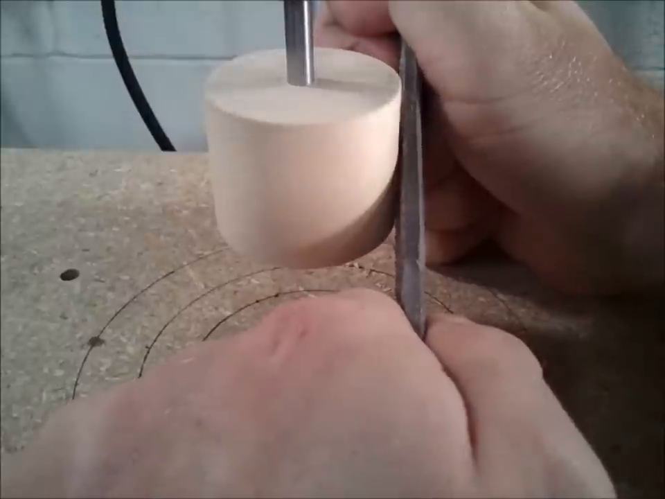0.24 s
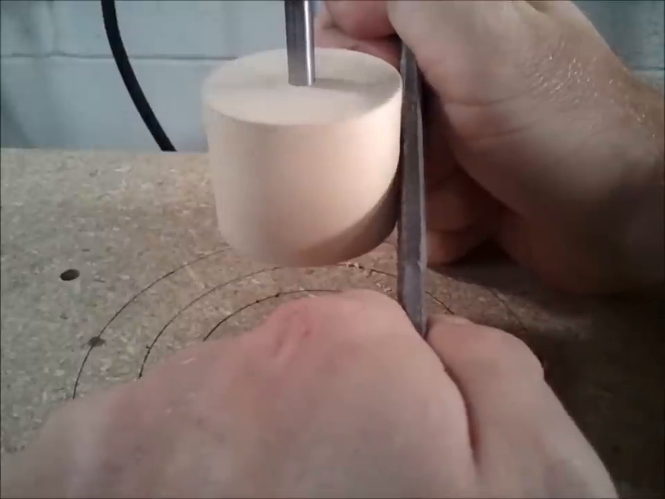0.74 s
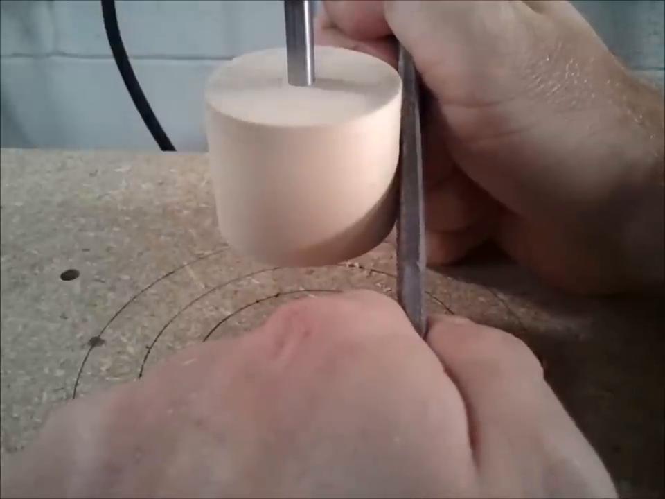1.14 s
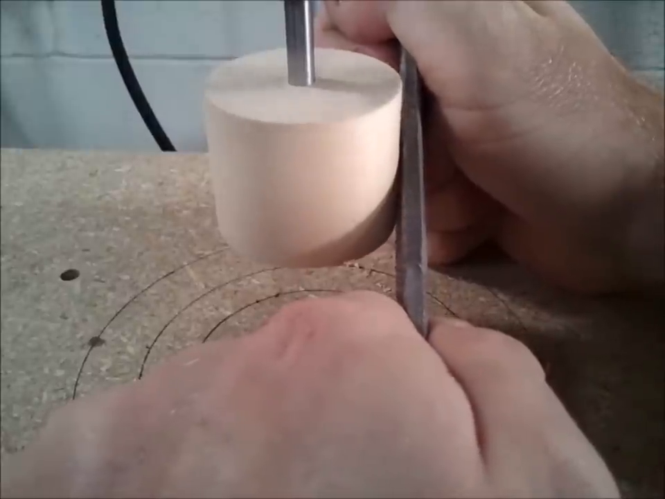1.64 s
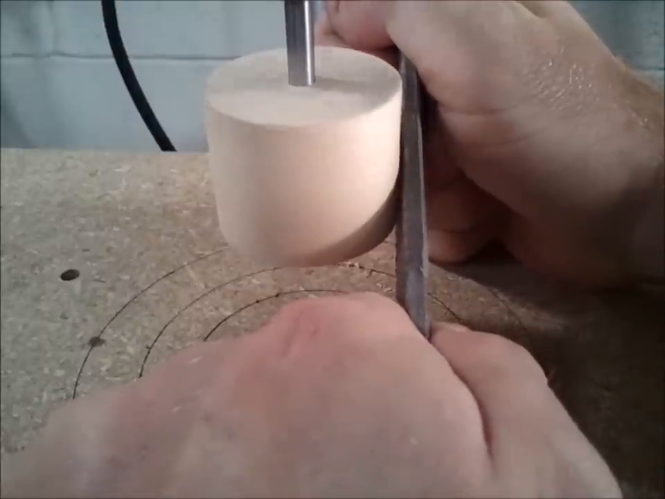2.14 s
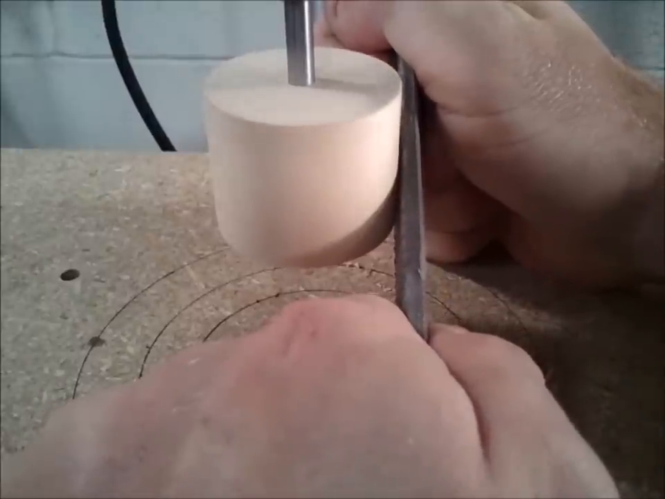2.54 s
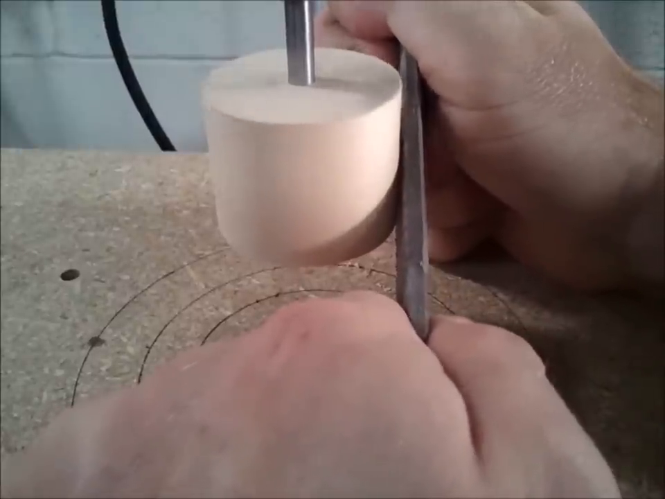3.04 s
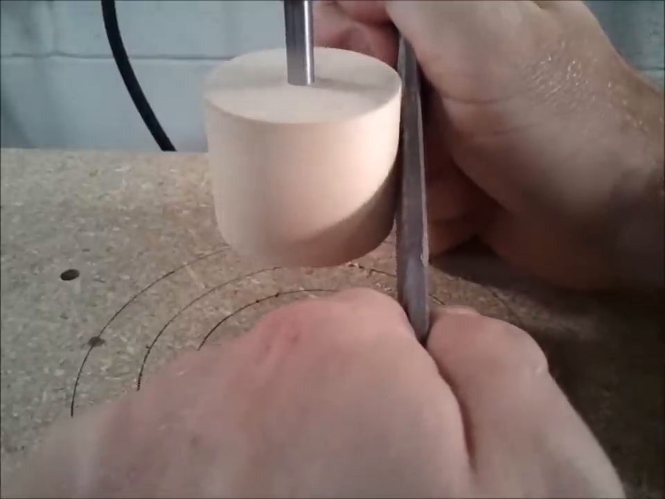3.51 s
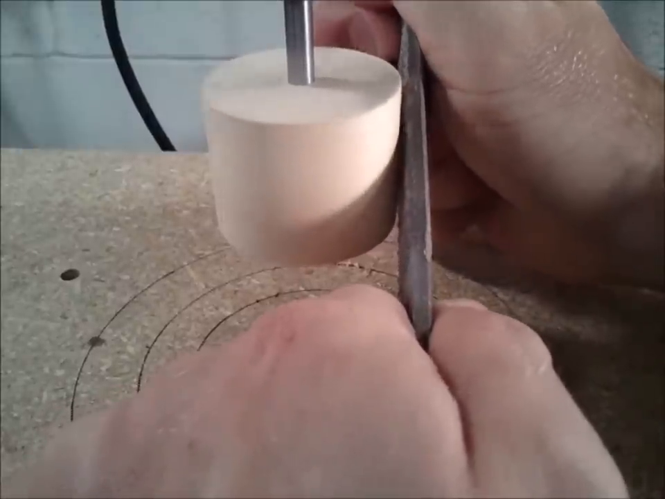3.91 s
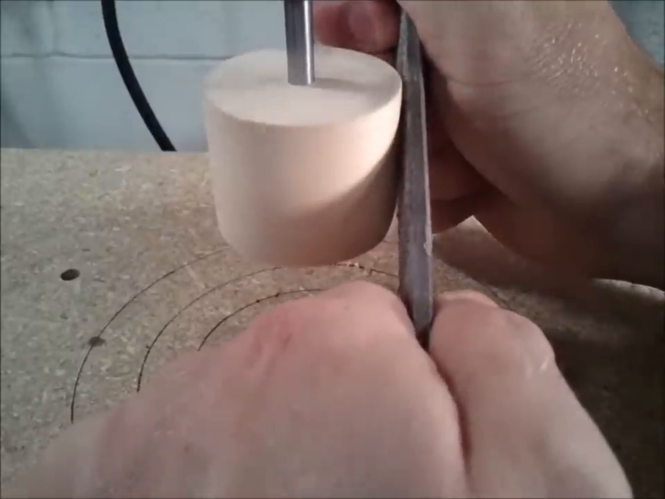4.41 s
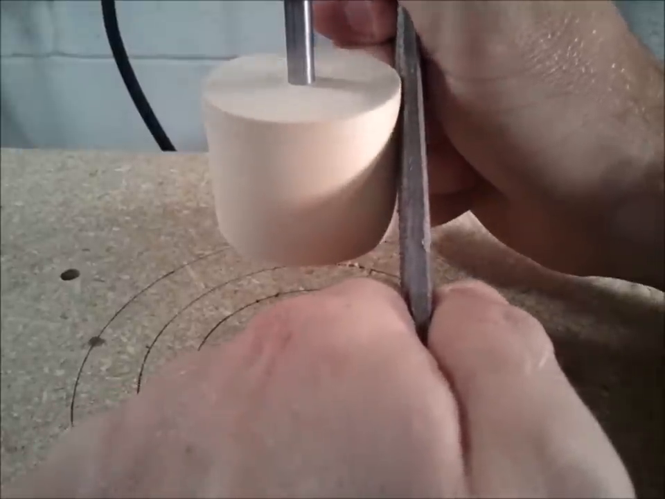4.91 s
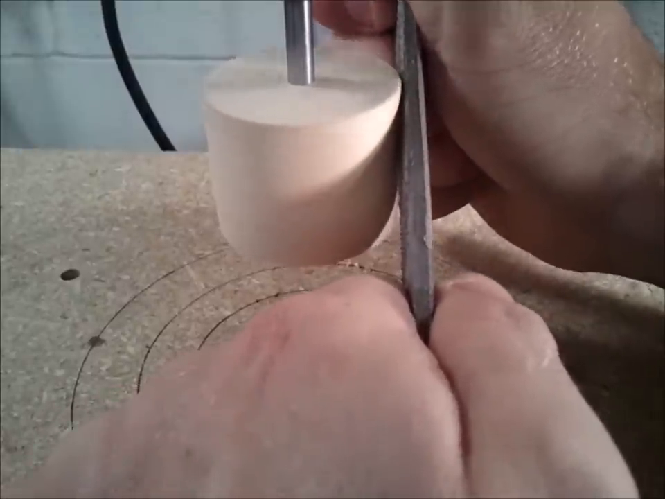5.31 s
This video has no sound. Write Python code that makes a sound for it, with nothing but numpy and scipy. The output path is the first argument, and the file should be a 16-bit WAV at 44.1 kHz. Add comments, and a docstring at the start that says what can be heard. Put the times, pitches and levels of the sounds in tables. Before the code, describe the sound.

Close up in a small workshop, a steel rasp grazes a wooden drum turning about nine times a second. Hissing scrapes pulse with each turn, with little zings and clacks. From about two seconds it bites harder: hollow judders, knocks and cracking splinters fill in the gaps. Late on the judder settles toward one pitch. A low motor hum runs underneath; treble is rather dull at the very top.

```python
"""In a small workshop, a wood rasp is held against an out-of-round wooden drum that spins in a drill press.
At first the teeth only graze: they bounce, land with a zing and sound in pulses once a turn.
Then the hands press harder and the teeth bite all the way round, with judders, knocks and cracking splinters.
Later the hands tip the blade over and its judder settles closer to one pitch.
Throughout, noisy tooth strikes ring the table, wood and steel blade, over the motor's hum tones and rumble."""
import sys
import numpy as np
from scipy import signal
from scipy.fft import rfft, irfft
from scipy.io import wavfile
from scipy.ndimage import uniform_filter1d

SR = 44100
rng = np.random.default_rng(int(sys.argv[2]) if len(sys.argv) > 2 else 0)


def generate_wav(sig):
    """Save sig (samples, or channels by samples) to the path in sys.argv[1] as 16-bit PCM at SR."""
    pcm = np.round(np.clip(np.atleast_2d(sig).T, -1, 1) * 32767).astype(np.int16)
    wavfile.write(sys.argv[1], SR, pcm)


N = 244975   # length in samples
TURNS_PER_S = 9.16   # speed of the drum


# The work of the hands. Each row: time in seconds, push on the table in dB,
# tearing of fibres in dB, hiss of the teeth in dB.
HAND_WORK = [(0, -31, -43.5, -39), (.52, -35, -44, -39), (.66, -41, -48, -40.5), (1.05, -37, -46.5, -39),
             (1.52, -42.5, -48, -39), (1.78, -35.5, -43.5, -37), (2.3, -33, -42, -35.5),
             (2.8, -31, -41.5, -35.5), (3.3, -32, -38, -35.5), (3.8, -29.5, -37.5, -35),
             (4.35, -31.5, -39, -36.5), (4.9, -30.5, -38, -36), (5.55, -33, -38, -37)]


def rasp():
    """Teeth catch and slip, shaking the table, tearing fibres, throwing chips and hissing."""
    push_db, tear_db, hiss_db = in_time(HAND_WORK)
    bite, rub, lift = contact()
    snag = drift(88)   # single rows of teeth dig in for a few milliseconds
    fibre_db = tear_db + 1.12 * bite
    teeth_db = hiss_db + 0.86 * rub
    chip_db = 0.5 * fibre_db + 0.44 * teeth_db - 9.5

    thrum = table(push_db, bite, shake_db=1.4 * lift + 1.6 * snag)
    thrum = thrum + drone(lift, push_db + bite, hz=418.9, level_db=-40.5)

    tear_hits = surface(hits_per_s=2800, spread_db=3.0, memory=0.35)
    tear = drum_wall(tear_hits * from_db(fibre_db + 0.89 * snag - 1.7))
    chip_hits = surface(hits_per_s=5000, spread_db=2.0, memory=0.26)
    chips = chip_sound(chip_hits * from_db(chip_db + 1.46 * snag + 0.46 * drift(120)))
    wood = sliding_echo(tear + chips, delay_s=.0031, share=0.43, swing=.1, wander=.12)

    steel = sliding_echo(blade_hiss(teeth_db), delay_s=.00142, share=0.49, swing=0.054, wander=0.024)
    note_level = from_db(hiss_db + 1.6 * rub - 13.5)
    note = note_level * contact_note(bite, top_hz=6540, bend_hz=950, width_hz=82)

    ticks = snaps(fibre_db, wood_db=-9.5, chip_db=-16.5)
    patches = grain_patches(hiss_db + lift, tear_db + 0.5 * lift)
    return knocks(thrum + judder()) + wood + ticks + splinters() + steel + note + landing_zings() + patches


# The high places of the oval drum. Each row: angle in turns, half arc in turns,
# bite in dB when grazing, bite in dB when seated (both added to the low side's bite).
HIGH_SIDES = [(.77, 0.042, 4, 3.5), (.83, 0.11, 7.5, 5.5), (.94, 0.062, 7, 4.5), (1.038, 0.052, 1, 5.5),
              (.44, .12, 1.5, 7.5), (.44, .03, 0.5, 2.5), (.58, .035, 3.5, 2)]
LOW_SIDE_BITE_DB = -5.5
# Ridges of hard grain that rub on the teeth. Each row: angle in turns, half arc in turns,
# rub in dB with the blade upright, rub in dB tilted (both added to the soft grain's rub).
RIDGES = [(0.52, 0.099, 5.5, 5), (0.738, 0.11, 4, 2.5), (1, 0.098, 5, -1.5), (.23, 0.056, -2.5, 3)]
SOFT_GRAIN_RUB_DB = -1.5


def contact():
    """Bite, rub and lift (dB) as the uneven drum passes under the rasp."""
    lean, lift = tilt(), bounces()
    seated = np.clip(seating() + .5, 0, 1)
    bite = LOW_SIDE_BITE_DB + .26 * lift
    for angle, arc, grazing_db, seated_db in HIGH_SIDES:
        bite = bite + bump(turns_from(angle), arc) * (grazing_db + seated * (seated_db - grazing_db))
    rub = SOFT_GRAIN_RUB_DB + lift
    for angle, arc, upright_db, tilted_db in RIDGES:
        rub = rub + bump(turns_from(angle), arc) * (upright_db + lean * (tilted_db - upright_db))
    return bite, rub, lift


# How the rasp sits on the drum. Each row: time in seconds,
# seating as a plain number (below 0 grazing, 0 just touching all round, 1 cutting all round).
SEATING = [(0, -0.3), (1.57, -0.44), (1.75, -0.26), (2.4, .25), (2.9, 1)]


def seating():
    """The seating rises as the teeth come to touch more of the drum's round."""
    return in_time(SEATING)[0]


TILT_FROM_S, TILT_TO_S = 3.44, 4   # the hands tip the blade over to a new angle


def tilt():
    """Lean of the blade, 0 upright to 1 tipped over."""
    return np.clip((seconds() - TILT_FROM_S) / (TILT_TO_S - TILT_FROM_S), 0, 1)


# While lightly held, the rasp bounces off the drum's flat. Each row: time in seconds when it lands again,
# time in the air in seconds, loss of contact in dB at the most.
BOUNCES = [(0.049, 0.014, -6.5), (0.157, 0.023, -8), (.265, 0.031, -11), (.375, .03, -6.5),
           (0.485, 0.027, -5.5), (.603, 0.043, -13), (.727, 0.071, -13.5), (.833, 0.063, -16),
           (0.925, 0.039, -8.5), (1.031, 0.02, -6.5), (1.143, 0.03, -14), (1.25, 0.029, -7),
           (1.362, 0.0337, -12.5), (1.478, 0.044, -14), (1.586, 0.049, -13.5), (1.682, 0.031, -6),
           (1.79, 0.032, -4), (1.9, 0.021, -5.5), (2.013, 0.024, -10)]
LEAVING_SHARE, TOUCHDOWN_S = 0.46, 0.0064   # it eases off over this share of the flight, lands abruptly


def bounces():
    """Loss of contact (dB) while the rasp is in the air."""
    t = seconds()
    lift = 0
    for lands, air_s, db in BOUNCES:
        leaving = np.clip((t - lands + air_s) / (LEAVING_SHARE * air_s), 0, 1)
        still_up = np.clip((lands - t) / TOUCHDOWN_S + .5, 0, 1)
        lift = lift + db * leaving * still_up
    return lift


# Ringing modes of press table and spindle. Each row: pitch in Hz, width in Hz, level in dB,
# dB gained per dB of push, dB gained per dB of bite.
TABLE_MODES = [(276, 45, -20, 1.5, 0.8), (366.2, 17, -12, 0.66, 0.5), (415.9, 14, -7.5, 1.5, 0.4),
               (476.7, 17, -8, 1.5, 0.5), (549.3, 12, -14.5, 2, 0), (612.5, 20, -10.5, 1.5, 0.7),
               (657.7, 24, -13, -0.1, 0), (737.3, 14, -12.5, 0.5, 1.87)]
TABLE_WANDER_S = 0.00038   # the shifting hands bend the ring a little in phase and pitch (spread of the delay)
USUAL_PUSH_DB = -32


def table(push_db, bite, shake_db):
    """The cutting force rings the table; some modes wake only under a hard push or a deep bite."""
    hits = surface(hits_per_s=2500, spread_db=2.0, memory=0.68)
    force = hits * from_db(USUAL_PUSH_DB + shake_db)
    extra_db = push_db - USUAL_PUSH_DB
    rings = 0
    for k, (hz, width_hz, db, push_growth, bite_growth) in enumerate(TABLE_MODES):
        mode_force = force * from_db(db + push_growth * extra_db + bite_growth * bite)
        rings = rings + (-1) ** k * driven(mode_force, hz, width_hz)   # neighbours in opposite phase
    rings = np.interp(seconds() - TABLE_WANDER_S * drift(6.36), seconds(), rings)
    return signal.sosfilt(signal.butter(2, [210, 950], "band", fs=SR, output="sos"), rings)


def driven(force, hz, width_hz):
    """A mode under friction: over a turn it swings as hard as it is driven."""
    ring = resonate(force, hz, width_hz)
    return ring * turn_rms(force) / turn_rms(ring)


# The drone swells and bends with each turn. Each row: angle in turns, swell in dB when grazing,
# swell in dB when seated, swell in dB when tilted, bend in Hz.
DRONE_SWELL = [(.06, 1.5, 9, 3, 12), (.2, 6, 0.5, -2, 5), (.36, -0.5, 2.5, -1, -12),
               (.55, -5.5, 0.5, 1, -10), (.72, -3, 1, 2, -8), (.9, 2, 1, 5, 14)]
# a harder push or a deeper bite stiffens the contact and sharpens the drone
DRONE_RISE_HZ_PER_DB, DRONE_RISE_FROM_DB = 2, -37


def drone(lift, force_db, hz, level_db):
    """Friction keeps the strongest table mode sounding as a tone that swells and bends every turn."""
    angles, *columns = np.transpose(DRONE_SWELL)
    turns = seconds() * TURNS_PER_S
    grazing_db, seated_db, tilted_db, bend_hz = [np.interp(turns, angles, c, period=1) for c in columns]
    rise_hz = DRONE_RISE_HZ_PER_DB * np.maximum(force_db - DRONE_RISE_FROM_DB, 0)
    phase = 2 * np.pi * np.cumsum(hz + rise_hz + bend_hz + 8 * drift(22)) / SR
    swell_db = grazing_db + np.clip(seating(), 0, 1) * (seated_db - grazing_db)
    swell_db = swell_db + tilt() * (tilted_db - seated_db)
    late_lift = np.roll(lift, SR // 100)   # the ring lags the contact by 10 ms
    return np.sqrt(2) * from_db(level_db + swell_db + 0.3 * late_lift + 1.8 * drift(32)) * np.sin(phase)


# The blade judders over the high spot of the drum. Each row: time in seconds, level in dB.
JUDDER = [(0, -39), (.5, -41.5), (.7, -42), (1.4, -41), (1.8, -33), (2.8, -35.5), (3.4, -35.5),
          (3.9, -28.5), (4.35, -31.5), (4.75, -32), (5.55, -36.5)]
# Its pitch falls as the spot slides off. Each row: angle from the high spot in turns,
# pitch in Hz while the blade is upright.
JUDDER_PITCH = [(-.22, 726), (-.15, 660), (-.09, 580), (-.04, 486), (.01, 435), (.12, 406.6)]
TILTED_JUDDER_HZ, TILTED_JUDDER_SHARE = 458.4, 0.92   # a tipped blade judders closer to one pitch
# The opposite side of the oval judders too. Each row: time in seconds, level in dB.
BACK_JUDDER = [(0, -49), (1.5, -52), (1.8, -34), (2.5, -32.5), (3.4, -28.5), (3.9, -36), (4.6, -32.5),
               (5.55, -38)]
BACK_ANGLE, BACK_HALF_ARC = .44, 0.072   # in turns
BACK_HZ, BACK_SAG_HZ_PER_TURN = 646, 351   # pitch at that angle, and how fast it falls


def judder():
    """Twice a turn the blade sticks and slips on a high spot: short, rough, falling notes."""
    (level_db,), (back_db,) = in_time(JUDDER), in_time(BACK_JUDDER)
    away, past = turns_from(0), turns_from(BACK_ANGLE)
    hz = np.interp(away, *np.transpose(JUDDER_PITCH))
    hz = hz + TILTED_JUDDER_SHARE * tilt() * (TILTED_JUDDER_HZ - hz)
    front = bump(away + 0.067, half=0.11) * rough_note(hz, level_db)
    back_hz = BACK_HZ - BACK_SAG_HZ_PER_TURN * past
    return front + bump(past, BACK_HALF_ARC) * rough_note(back_hz, back_db)


def rough_note(hz, level_db):
    """Stick and slip make a tone uneven in pitch and strength."""
    phase = 2 * np.pi * np.cumsum(hz * (1 + .031 * drift(40))) / SR
    return np.sqrt(2) * from_db(level_db + 1.2 * drift(90)) * np.sin(phase)


# The teeth dig in and the work knocks. Each row: time in seconds, half length in seconds,
# pitch in Hz, level in dB.
HARD_DIGS = [(.212, 0.0058, 570, -28.5), (.427, 0.011, 740, -33), (.543, 0.0052, 580, -32.5),
             (1.63, 0.0053, 562, -27), (1.749, 0.0096, 479.6, -27.5), (1.85, .01, 509, -30.5),
             (2.175, 0.0065, 526, -31), (2.283, 0.0069, 509, -26.5), (2.393, 0.0068, 523, -26.5),
             (2.667, 0.0053, 675.7, -27.5), (2.777, .0035, 635.2, -25.5), (2.839, .006, 457.1, -24),
             (2.892, 0.0064, 500, -28.5), (2.994, 0.0057, 683.6, -28), (3.218, 0.0046, 548, -28),
             (3.437, .005, 550.3, -27.5), (3.481, .005, 536, -30.5), (3.556, 0.0053, 607, -27),
             (3.605, .005, 465, -28), (3.7, .005, 476.5, -25.5), (3.794, .0028, 485, -23.5),
             (3.8215, 0.0013, 501, -21.5), (3.914, 0.01, 499.4, -24), (3.993, 0.0063, 492, -25.5),
             (4.028, .007, 499, -26), (4.087, 0.0053, 490, -22), (4.694, 0.0057, 450.6, -21),
             (4.792, 0.0064, 458, -24.5), (4.908, 0.0074, 467, -29), (5.02, .007, 465, -28),
             (5.231, .0044, 463, -22), (5.349, 0.0037, 455, -26)]
DIG_CHOKE = 0.51   # share of the thrum that a dig holds still


def knocks(thrum):
    """A dig chokes the ring of table and judder and shakes the work at its own pitch for a few cycles."""
    t, out = seconds(), thrum.copy()
    for s, half, hz, db in HARD_DIGS:
        near = abs(t - s) < 4 * half
        shake = np.sqrt(2) * from_db(db) * np.sin(2 * np.pi * hz * (t[near] - s))
        out[near] += bump(t[near] - s, half) * (shake - DIG_CHOKE * thrum[near])
    return out


# Sound of the drum wall as the fibres tear. Each row: frequency in Hz, relative level in dB per Hz.
TEAR = [(250, -13.5), (500, -2.5), (640, 3), (690, -3), (738, 3.5), (790, -3), (850, 0.5), (920, -6),
        (1080, 0.5), (1270, -5.5), (1420, -2.5), (1550, -3.5), (1660, -5), (1800, -18), (1950, -25.5),
        (2600, -35.5)]


def drum_wall(x):
    """The wooden drum wall colours whatever tears or cracks in it."""
    return colour(x, TEAR)


# Sound of splintering chips. Each row: frequency in Hz, relative level in dB per Hz.
CHIPS = [(900, -5), (1650, -0.5), (1850, 0), (2150, 1), (2900, 0), (3200, 0), (3750, -1.5), (4500, -0.5),
         (6000, -26.5), (8000, -26)]


def chip_sound(x):
    """Small chips sound higher and brighter than the wall."""
    return colour(x, CHIPS)


def snaps(fibre_db, wood_db, chip_db):
    """Single fibres snap: dry ticks that sound through drum wall and chips at once."""
    ticks = surface(hits_per_s=260, spread_db=3.5, memory=0.19) * from_db(fibre_db)
    return from_db(wood_db) * drum_wall(ticks) + from_db(chip_db) * chip_sound(ticks)


# Whole splinters crack off. Each row: time in seconds, level in dB.
SPLINTERS = [(.065, -38), (.204, -32), (.415, -33), (0.544, -34), (.852, -39), (1.402, -33.5), (1.727, -33),
             (2.27, -35), (2.667, -32), (3.102, -34), (3.25, -29), (3.321, -33), (3.541, -36),
             (3.653, -27.5), (3.762, -29), (4.46, -28.5), (4.999, -33.5)]
SPLINTER_HALF_S, SPLINTER_CHIP_DB = .0024, -9   # half length, and level of the chip sound


def splinters():
    """A splinter breaks in a tight cluster of snaps."""
    breaking = sum(from_db(db) * bump(seconds() - s, SPLINTER_HALF_S) for s, db in SPLINTERS)
    cracks = breaking * surface(hits_per_s=3000, spread_db=3.0, memory=.1)
    wall = signal.sosfilt(signal.butter(2, 850, "high", fs=SR, output="sos"), drum_wall(cracks))
    return wall + from_db(SPLINTER_CHIP_DB) * chip_sound(cracks)


# Sound of the steel blade under its teeth. Each row: frequency in Hz, relative level in dB per Hz.
BLADE = [(3400, -50), (3900, -14.5), (4300, -6.5), (4580, -4.5), (4800, 1.5), (5060, 1), (5250, 0.5),
         (5520, -0.5), (6050, -1.5), (6370, 3.5), (6850, -0.5), (7250, 2.5), (7500, -12), (7900, -44)]


def blade_hiss(teeth_db):
    """Dense tooth strikes make the steel blade hiss."""
    hits = surface(hits_per_s=8000, spread_db=4.5, memory=0.21)
    return colour(hits * from_db(teeth_db + 1.3 * drift(89) - 3.0), BLADE)


def contact_note(bite, top_hz, bend_hz, width_hz):
    """A deeper bite stiffens the contact, so this resonance of the blade rises and falls with each stroke."""
    firmness = np.tanh(uniform_filter1d(bite, size=600) / 5 + 0.51)   # -1 barely touching, 1 seated
    hz = top_hz - bend_hz * (1 - firmness) / 2 + 70 * drift(17)
    r = np.exp(-np.pi * width_hz / SR)
    noise = rng.standard_normal(N) + 1j * rng.standard_normal(N)
    waver = signal.lfilter([1], [1, -2 * r, r * r], noise)
    return rms_one((waver * np.exp(2j * np.pi * np.cumsum(hz) / SR)).real)


def sliding_echo(x, delay_s, share, swing, wander):
    """A wave comes back along the blade; the contact point moves, so the colour sweeps."""
    t = seconds()
    delay = delay_s * (1 + swing * np.cos(2 * np.pi * TURNS_PER_S * t) + wander * drift(14))
    return (x + share * np.interp(t - delay, t, x)) / np.hypot(1, share)


# The hardest landings zing. Each row: time in seconds, level in dB.
LANDINGS = [(0.066, -29), (0.377, -35), (0.413, -28.5), (.734, -32.5), (.846, -35.5), (1.373, -30.5),
            (1.502, -30), (1.61, -32.5), (2.017, -38)]
LANDING_HALF_S, LANDING_CLACK_DB = 0.0023, -8.5   # the wood clacks with each, this far under the zing


def landing_zings():
    """A short burst of noise as the blade lands rings one resonance of the steel and clacks the wood."""
    landing = sum(from_db(db) * bump(seconds() - s, LANDING_HALF_S) for s, db in LANDINGS)
    landing = landing * rng.standard_normal(N)
    return resonate(landing, hz=6070, width_hz=230) + from_db(LANDING_CLACK_DB) * drum_wall(landing)


# Patches of grain that set the blade singing at every turn. Each row: angle in turns, half arc in turns,
# pitch in Hz, width in Hz, dB over the hiss, dB gained when seated, dB gained when tilted.
BLADE_SPOTS = [(0.73, 0.16, 6350, 190, -3, 0, -3), (.23, 0.079, 5550, 220, -7.5, 6.5, -0.5),
               (.23, 0.077, 5920, 110, -8.5, 0.5, 7), (0.2, 0.13, 6400, 120, -2, 1, -8.5),
               (0.47, 0.094, 4870, 180, -10, 9, -7.5), (0.95, 0.19, 4860, 410, -7, 1, 1.5),
               (0.031, 0.09, 2800, 320, -19, -4.5, 14)]
# Patches that set the wood ringing at every turn. Each row: angle in turns, half arc in turns,
# pitch in Hz, width in Hz, dB over the tearing, dB gained when seated, dB gained when tilted.
WOOD_SPOTS = [(0.755, .055, 1550, 110, -2.5, 4, -1.5), (.775, 0.054, 1100, 140, -2, 1, -4),
              (.97, 0.15, 1560, 70, -12, 3, 2), (0.42, 0.19, 1520, 100, -13.5, 15.5, -5.5),
              (0.8, 0.12, 950, 170, -8, 4.5, 3), (0.41, .14, 1050, 180, -17, 13.5, -2),
              (0.97, 0.28, 1990, 130, -11.5, -10.5, -2.5), (.88, 0.11, 470, 52, -11.5, 2.5, 9.5),
              (.68, .17, 255, 30, -5, 1.5, -5.5), (.2, .22, 226, 35, -10, 0.5, 2),
              (.73, .04, 738, 40, 2.5, -1, -3), (.42, 0.076, 465, 43, -11, 4.5, 6)]


def grain_patches(steel_db, wood_db):
    """Single resonances of steel and wood ring out where certain patches of grain pass."""
    return spot_rings(BLADE_SPOTS, steel_db) + spot_rings(WOOD_SPOTS, wood_db)


# no two passes over a patch are quite alike in pitch (share of its Hz) and strength
SPOT_WANDER, SPOT_VARY_DB = .012, 1


def spot_rings(spots, level_db):
    """Each patch of grain excites its own resonance as it passes under the teeth."""
    out, lean, seated = 0, tilt(), np.clip(seating(), 0, 1)
    for angle, arc, hz, width_hz, db, seated_db, tilted_db in spots:
        spot_db = level_db + db + seated * seated_db + lean * tilted_db + SPOT_VARY_DB * drift(11.0)
        gain = from_db(spot_db) * bump(turns_from(angle), arc)
        # two slow noises, carried up to the patch's pitch, make a narrow band that can wander
        r = np.exp(-np.pi * width_hz / SR)
        ring = signal.lfilter([np.sqrt(1 - r * r)], [1, -r], gain * rng.standard_normal((2, N)))
        ring = signal.sosfilt(signal.butter(2, 2 * width_hz, fs=SR, output="sos"), ring)
        phase = 2 * np.pi * np.cumsum(hz * (1 + SPOT_WANDER * drift(8))) / SR
        out = out + ring[0] * np.cos(phase) + ring[1] * np.sin(phase)
    return out


def surface(hits_per_s, spread_db, memory):
    """Tooth strikes of uneven size; part of the pattern comes back on the next turn."""
    shape = (int(N / SR * TURNS_PER_S) + 1, round(SR / TURNS_PER_S))   # one row per turn
    hits = (rng.random(shape) < hits_per_s / SR) * rng.choice([-1, 1], shape)
    hits = hits * from_db(spread_db * np.minimum(rng.exponential(1, shape), 4))
    return rms_one(signal.lfilter([1], [1, -memory], hits, axis=0).ravel()[:N])


# Belt, mains and spindle tones. Each row: pitch in Hz, usual level in dB rms.
HUM = [(46.2, -68.5), (120, -51.5), (147.3, -68), (238.5, -62.5), (276.5, -57.5)]
# Motor and belt rumble. Each row: frequency in Hz, relative level in dB per Hz.
RUMBLE = [(20, -20.5), (50, -15), (80, -17.5), (130, -12), (165, -10), (186, 3.5), (212, -5.5), (240, -3),
          (265, -4), (286, 3.5), (314, -12), (420, 2), (800, -18), (4000, -35.5)]


def motor(rumble_db, waver_db):
    """Tones of steady pitch and wavering level, over a rumble that partly repeats with the spindle."""
    tones = 0
    for hz, db in HUM:
        level = np.sqrt(2) * from_db(db + waver_db * drift(1.4))
        tones = tones + level * np.sin(2 * np.pi * (hz * seconds() + rng.random()))
    rumble = colour(surface(hits_per_s=13000, spread_db=4.5, memory=0.4), RUMBLE)
    return tones + from_db(rumble_db) * rumble


def workshop(x, t60, wet_db, wall_hz):
    """A short, diffuse echo from the walls close by, duller than the direct sound."""
    t = np.arange(SR // 2) / SR
    tail = rng.standard_normal(len(t)) * from_db(-60 * t / t60) * (t > .004)
    tail = signal.lfilter(*signal.butter(1, wall_hz, fs=SR), tail / np.linalg.norm(tail))
    return x + from_db(wet_db) * signal.fftconvolve(x, tail)[:N]


def dip(x, hz, width_hz, depth):
    """A mild dip in the sound around one pitch: a partial notch."""
    notched = signal.lfilter(*signal.iirnotch(hz, hz / width_hz, fs=SR), x)
    return x + depth * (notched - x)


def from_db(db):
    """Decibels to a plain factor."""
    return 10 ** (np.asarray(db) / 20)


def rms_one(x):
    """Scale to an rms of 1."""
    return x / np.sqrt(np.mean(x ** 2) + 1e-20)


def turn_rms(x):
    """Strength over about one turn (4800 samples)."""
    return np.sqrt(np.abs(uniform_filter1d(x * x, size=4800)) + 1e-18)


def seconds():
    """The time of every sample."""
    return np.arange(N) / SR


def turns_from(angle):
    """How far the drum has turned past this angle, from -.5 to .5."""
    return (seconds() * TURNS_PER_S - angle + .5) % 1 - .5


def in_time(rows):
    """Each column of a curve, at every sample."""
    s, *columns = np.transpose(rows)
    return [np.interp(seconds(), s, c) for c in columns]


def bump(distance, half):
    """A bell of height 1."""
    return np.exp(-(distance / half) ** 2)


def drift(rate_hz):
    """Slow chance with spread 1, drawn at every 20th sample and joined by straight lines."""
    r = np.exp(-2 * np.pi * rate_hz * 20 / SR)
    noise = rng.standard_normal(N // 20 + 4002)
    slow = signal.lfilter([1], [1, -2 * r, r * r], noise)[4000:]   # skip the filter's start
    return np.interp(np.arange(N) / 20, np.arange(len(slow)), rms_one(slow))


def resonate(x, hz, width_hz):
    """A resonance that keeps the power of white noise."""
    r = np.exp(-np.pi * width_hz / SR)
    zeros = np.sqrt((1 - r * r) / 2) * np.array([1, 0, -1])
    return signal.lfilter(zeros, [1, -2 * r * np.cos(2 * np.pi * hz / SR), r * r], x)


def colour(x, spectrum, size=8192):
    """A causal (minimum-phase) body with this spectrum; keeps the power of white noise."""
    hz, db = np.transpose(spectrum)
    grid = np.maximum(np.fft.rfftfreq(size, 1 / SR), 1)
    octaves_beyond = np.maximum(np.log2(grid / hz[-1]), 0) + np.maximum(np.log2(hz[0] / grid), 0)
    grid_db = np.interp(np.log(grid), np.log(hz), db) - 10 * octaves_beyond
    # folding the cepstrum forward in time puts the energy of the response at its start
    cepstrum = irfft(np.log(from_db(grid_db)))
    cepstrum[1:size // 2] *= 2
    cepstrum[size // 2 + 1:] = 0
    response = irfft(np.exp(rfft(cepstrum)))
    return signal.fftconvolve(x, response / np.linalg.norm(response))[:N]


def scene():
    """Rasp and motor, heard from close by; only the rasp gets the echo of the walls."""
    scrape = workshop(rasp(), t60=0.2, wet_db=-14.5, wall_hz=4560)
    hum = motor(rumble_db=-44.0, waver_db=1.0)
    return dip(scrape + hum, hz=3375, width_hz=600, depth=0.36)[None]


def record(dry):
    """The treble above 7600 Hz is cut steeply."""
    return signal.sosfilt(signal.ellip(12, .2, 75, 7600, fs=SR, output="sos"), dry)


dry = scene()
out = record(dry)
generate_wav(out)
```